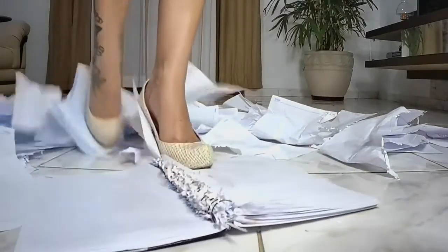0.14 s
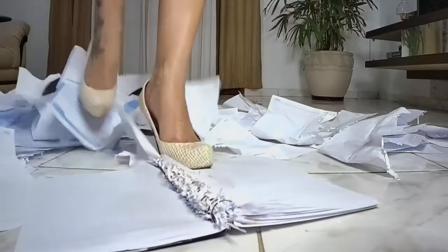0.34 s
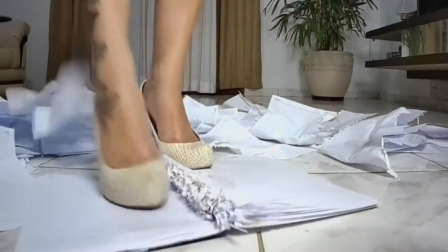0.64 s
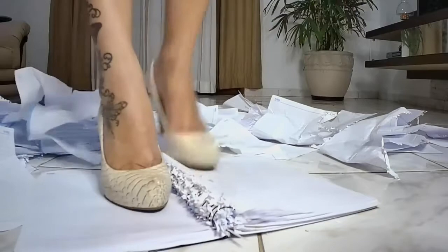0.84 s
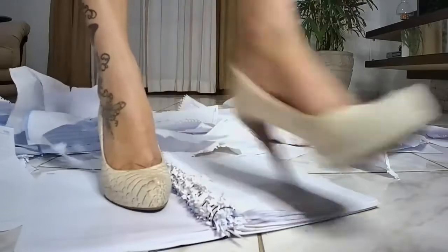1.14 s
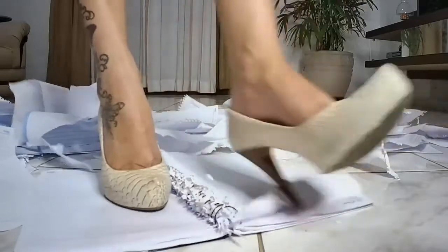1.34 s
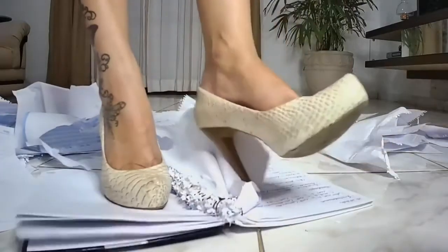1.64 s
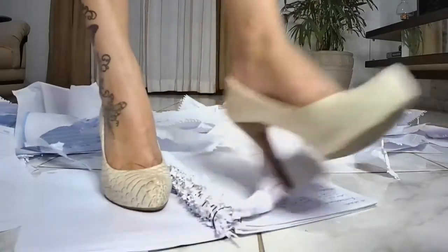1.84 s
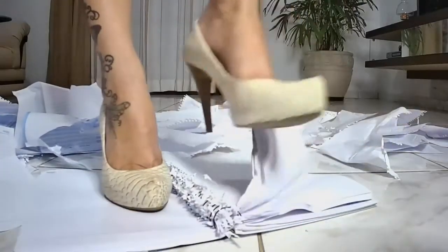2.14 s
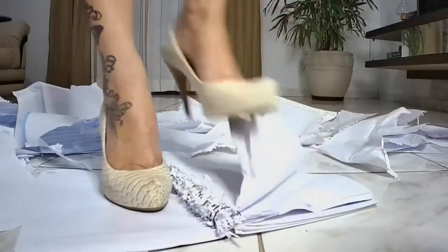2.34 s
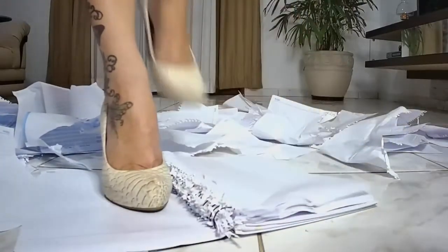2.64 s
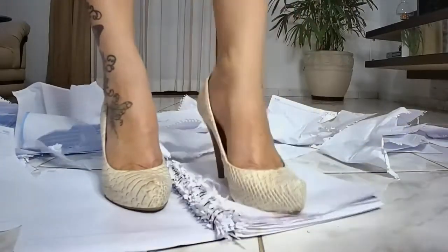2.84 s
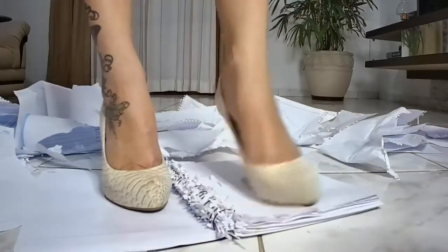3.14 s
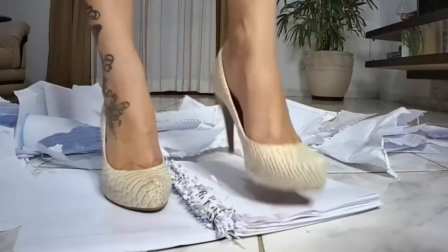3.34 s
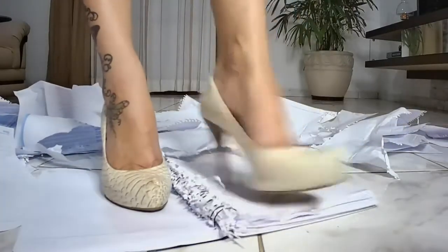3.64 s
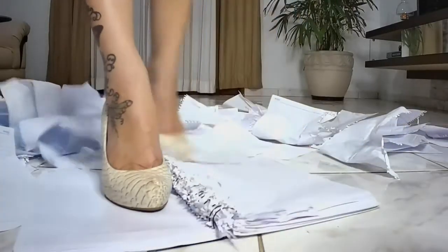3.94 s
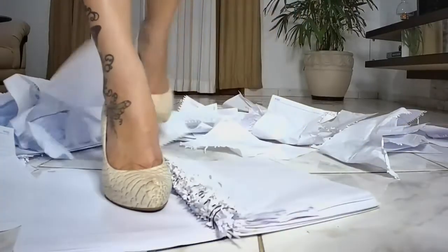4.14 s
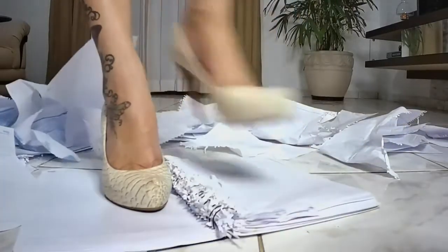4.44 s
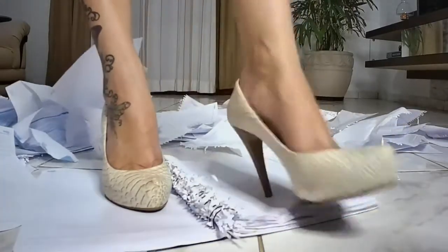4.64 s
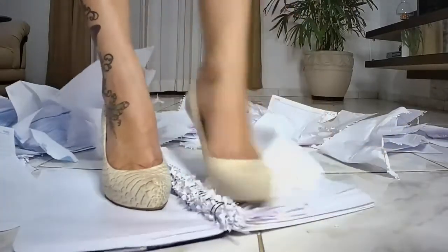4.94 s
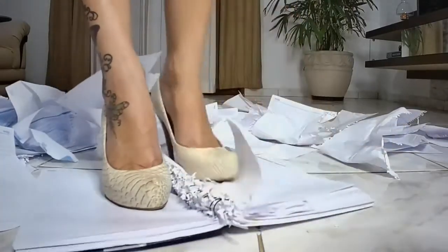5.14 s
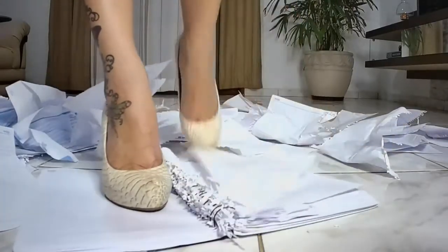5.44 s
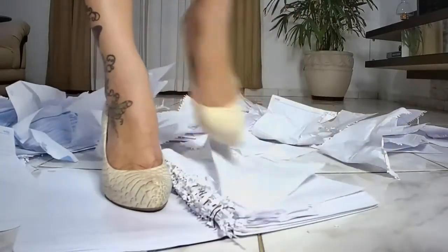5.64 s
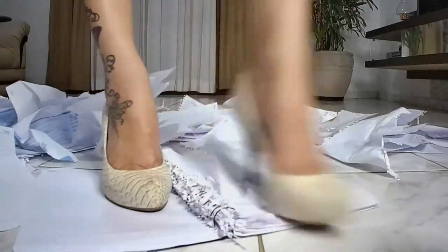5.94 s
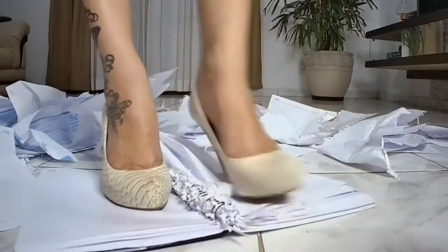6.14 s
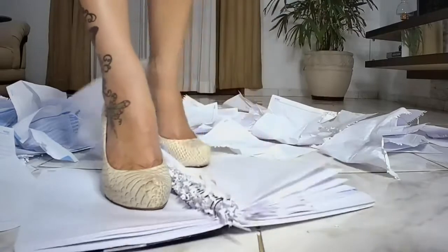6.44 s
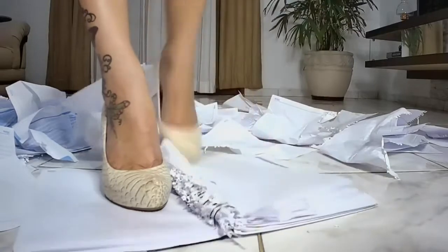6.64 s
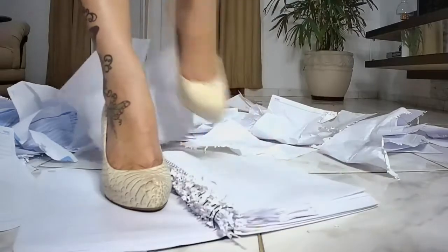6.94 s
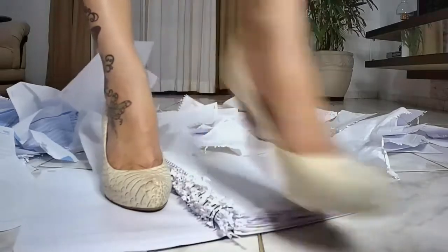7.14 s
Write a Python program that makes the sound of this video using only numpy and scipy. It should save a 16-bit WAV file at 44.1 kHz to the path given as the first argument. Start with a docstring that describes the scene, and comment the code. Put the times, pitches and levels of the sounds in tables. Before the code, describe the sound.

High heels tread on an open notebook and loose sheets on a tiled floor, heard close in a hard-walled living room with a short lively echo and barely audible hush. It opens mid-rustle, fading, with small snaps and soft taps around 0.5 s. Light thuds and crisp snaps cluster at 1.2 s and again near 2.0 s with thin paper crackle. At 2.7 s a sharp crack and padded knock stand out, followed by quiet. Knocks from 3.4 s lead into two hard, ripping tears at about 3.65 and 3.8 s, which trail away. Crackling strokes return from 4.6 s, with bright snaps around 5.0 s and a short hissy scrape at 5.25 s. After crisp creases at 5.9 s, the densest burst of snaps, crunching and heavy knocks hits at 6.1 s. Lighter rustles follow at 6.5 and 6.9 s, with a last soft tap and crinkle at 7.2 s.

```python
"""High heels tread on an open notebook on a tiled floor, heard close up in a hard-walled living room.
It opens mid-rustle, with light strokes and snaps; a sharp crack at 2.7 s leads to two hard tears near 3.7 s.
More strokes crackle from 4.6 s, the densest burst of snaps and knocks comes near 6.1 s, then it thins out.
Swarms of clicks ring as paper, pulses snap as creases, soft pushes thud, noisy resonances scrape and trail.
Decaying noise and standing waves make the room's answer; coloured noise is the faint hush throughout."""
import sys
import numpy as np
from scipy import signal
from scipy.fft import rfft, irfft
from scipy.io import wavfile
from scipy.ndimage import uniform_filter1d

SR = 44100
rng = np.random.default_rng(int(sys.argv[2]) if len(sys.argv) > 2 else 0)


def output_pcm(signal):
    """Save a mono or channel-first signal as 16-bit PCM at the path in sys.argv[1].

    Samples are clipped to [-1, 1] before scaling.
    """
    pcm = np.clip(np.atleast_2d(signal).T, -1, 1) * 32767
    wavfile.write(sys.argv[1], SR, np.round(pcm).astype(np.int16))


N = 321930  # samples

HUSH_DB = -64  # rms level of the background hush
TOP_HZ = 15900  # upper edge of the sound

# spectrum of the background hush: frequency_hz, level_db
HUSH_COLOUR = [(15, -28), (25, 0), (53, -3), (91, -6), (126, -10.5), (248, -14), (425, -19.5), (557, -25),
               (14600, -35.5), (15800, -43)]
# decay of the room: frequency_hz, t60_s
ROOM_DECAY = [(150, 1.28), (500, 0.8), (1500, 0.87), (4000, 0.64), (8000, 0.35), (15000, 0.37)]
# spectrum of the room's echo: frequency_hz, level_db
ECHO_COLOUR = [(60, -8), (250, -3), (700, -5), (1600, -2), (4000, -3.5), (9000, 3), (15000, -10)]
# standing waves of the room: frequency_hz, relative_level_db
STANDING_WAVES = [(173, -6), (203, 6), (240, 3), (395, -1), (597, 8), (839, -21)]
# drawn-out scrapes, hisses and ringing tails, each a noisy resonance at one pitch:
# start_s, end_s, level_db, pitch_hz, resonance_q
NOISY_RESONANCES = [(0, .144, -48, 251, 2.6), (1.189, 1.309, -48, 645, 2), (1.402, 1.607, -59, 9500, 2.6),
                    (2.147, 2.319, -57.5, 8900, 2.6), (3.373, 3.553, -47.5, 320, 2.8),
                    (4.63, 4.816, -48, 745, 2.6), (5.249, 5.308, -30, 4440, 2.6),
                    (5.678, 5.787, -63, 1430, 4), (5.679, 5.766, -64, 2800, 6),
                    (7.191, 7.3, -49.5, 670, 2.6)]
# low ringing after a knock, mostly the room's colour: frequency_hz, relative_level_db, t60_s
LOW_RINGING = [(221, -4.5, 0.24), (306, 10, 0.1), (414, -13, .1), (496, -10, .08), (650, 3, 0.072),
               (980, -24, 0.048), (1640, -12, 0.044)]
# heel and sole landing on the paper-covered tiles: start_s, thud_peak_db,
# pitch_hz (lower for a softer contact), paper_pad_thump_relative_db
LANDINGS = [(.456, -33.5, 750, -22), (.554, -33.5, 1410, -20), (.564, -42, 152, -18), (.645, -35, 800, -20),
            (1.154, -28, 500, -10), (1.187, -33, 697, -18), (1.231, -24.5, 651, -25),
            (1.773, -42.5, 258, -17), (1.971, -25.5, 1480, -14), (2.002, -37, 199, -12),
            (2.427, -33, 606, -18), (2.703, -16.5, 520, -11), (2.979, -29.5, 570, -17),
            (3.37, -20.5, 500, -18), (3.376, -16.5, 318, -38), (3.535, -37, 388, -19),
            (3.655, -19.5, 598, -16), (3.71, -14, 1303, -22), (3.764, -27, 278, -16),
            (4.512, -26, 730, -12), (4.522, -32, 377, -18), (4.627, -26, 690, -21), (5.101, -35, 232, -21),
            (5.911, -25, 1280, -14), (6.073, -21, 810, -20), (6.098, -17.5, 410, -16),
            (6.131, -13, 450, -12), (6.494, -32, 466, -20), (6.564, -23.5, 783, -11),
            (7.195, -35, 680, -21), (7.217, -26.5, 670, -24)]
# single creases snapping: start_s, level_db (before trim), pitch_hz, resonance_q,
# trailing_crackle_relative_db (before trim)
CREASES = [(.138, -30, 2500, 1.1, -12), (.3503, -25, 3860, 1.7, -6), (.4552, -28, 1900, 1.4, -15),
           (.6725, -24.5, 3790, .3, -7.5), (.715, -23, 4120, 1, -22), (.844, -42, 1280, 2, -9),
           (1.0927, -42, 2370, 4, -4), (1.228, -23.5, 2040, 1.3, -10), (1.2489, -18, 1800, 1, -14),
           (1.2545, -13, 6040, .7, -11), (1.278, -25, 5000, .8, -10), (1.2866, -23, 3400, .5, -8),
           (1.363, -20.5, 5510, 1.1, -30), (1.531, -32, 1180, 2, -18), (1.892, -22, 5170, 1, -17),
           (1.9713, -19, 2410, 1.7, -9.5), (1.9753, -20, 2960, 5, -13), (2.008, -19, 2200, 1.8, -13),
           (2.0823, -15, 2500, 2.2, -16), (2.4325, -33.5, 1650, 1.6, -7), (2.7156, -6, 5000, .55, -23),
           (2.979, -27, 1600, 1.3, -15), (3.3758, -19.5, 1890, .7, -16), (3.627, -19, 4000, .5, -4),
           (3.651, -7.5, 5200, 1.2, -7), (3.7084, -17, 2090, 1, -12), (3.8031, -5, 4550, 2.6, -27),
           (4.2846, -36, 2260, 3, -12), (4.5195, -33, 1630, 1.1, -4.5), (4.6282, -20, 1430, .6, -23),
           (4.739, -15, 6180, .4, -27), (4.9165, -15, 2440, 2.7, -10), (4.923, -11, 2500, 1, -14),
           (4.9745, -8, 2250, 1.6, -23), (5.0022, -7.5, 3800, .9, -12), (5.1544, -25, 2660, 2, -13),
           (5.321, -11, 5160, 2, -23), (5.6886, -36, 1570, 2, -5), (5.8188, -34, 2000, 1.5, -8),
           (5.855, -27, 3500, .7, -7.5), (5.8778, -12, 4300, 2, -10), (5.9211, -7, 3000, .7, -13.5),
           (6.0792, -17, 1890, 2.3, -8), (6.097, -8, 2770, .8, -6), (6.113, -3, 3330, .8, -8),
           (6.1226, -3, 2580, .8, -21), (6.1418, -7, 3930, .7, -7.5), (6.1557, -7, 2600, .6, -10),
           (6.1657, -4.5, 1800, .8, -11), (6.4573, -25, 4250, 2.1, -6.5), (6.56, -19.5, 4940, 3.5, -5),
           (6.5795, -18, 4050, 1, -10), (6.9095, -27, 2600, 2, -10), (7.1327, -40, 2200, 1.5, -7),
           (7.2065, -27, 1800, 3.1, -8), (7.2182, -21, 2030, .6, -20.5), (7.283, -27, 1450, 2.9, -12)]
# strokes of the foot through the paper: start_s, attack_s, hold_s, release_s (per 20 dB),
# level_db, low_flapping_relative_db (before trim), sliding_hiss_relative_db (at its onset),
# pitch_hz (of the flexing sheet)
FOOT_STROKES = [(0, .003, .02, .34, -41.5, -2, -4.5, 2450), (.28, .06, .02, .36, -48.5, -3.5, -6.5, 2350),
                (.545, .015, .01, .11, -54, 3, -8, 1900), (.635, .04, .005, .16, -45.5, -7, -7, 2300),
                (1.08, .012, .05, .1, -68, 0, -16, 2200), (1.146, .007, .04, .15, -55, -3, -3, 2050),
                (1.19, .06, .015, .15, -45, -5.5, -3, 2650), (1.39, .05, .14, .08, -54, -2, -5.5, 2650),
                (1.63, .05, .1, .35, -54, -2, -3.5, 2500), (1.835, .04, .03, .4, -51.5, -3, -7.5, 2550),
                (2.11, .09, .05, .15, -59, -12, 1.5, 3000), (2.689, .008, .022, .085, -39, 2, -2, 2450),
                (2.955, .025, .035, .13, -58, 3, 3, 2100), (3.36, .03, .01, .17, -54.5, 8, -7, 1500),
                (3.515, .023, .005, .085, -50, 4, 0, 2270), (3.608, .028, .045, .17, -31, -2.5, 1, 3050),
                (3.78, .035, .014, .18, -27, -5.5, -4.5, 2700), (4.1, .025, .005, .2, -52, -5, -7, 2500),
                (4.42, .015, .02, .15, -65, -2, -9, 2200), (4.634, .007, .04, .2, -53, 1, -4, 2100),
                (4.7, .047, .032, .07, -40, -1.5, 1.5, 2680), (4.835, .08, .07, .11, -34, -2, -2.5, 2400),
                (5.135, .025, .05, .1, -48, -4, -4, 2700), (5.16, .1, .05, .075, -39, -10, 6, 3900),
                (5.31, .02, .003, .11, -40, -7, -4, 3300), (5.435, .015, .01, .11, -55, 2, 2, 2800),
                (5.78, .05, .02, .05, -61, 3, 6, 2700), (5.842, .04, .046, .13, -36.5, -4, -1, 2950),
                (6.048, .065, .06, .145, -27, -1.5, -4.5, 2150), (6.21, .04, .06, .14, -39, -8, 1, 2200),
                (6.445, .014, .06, .1, -47.5, -6, -1, 3050), (6.5, .1, .012, .12, -37.5, -4.5, 0, 3300),
                (6.7, .06, .09, .1, -60, -1, -4, 2600), (6.902, .012, .005, .06, -52, 3, -5, 2070),
                (6.912, .025, .02, .13, -58, -6, 13, 3340), (6.98, .045, .005, .11, -52, -1, -8, 2600),
                (7.18, .04, .085, .1, -46, -2, -5, 2150)]
# spectrum of the rustling paper: frequency_hz, level_db
PAPER_COLOUR = [(29, -51), (50, -17), (184, -4.5), (304, -4), (397, -2.5), (437, -3), (597, -2), (642, -2),
                (742, -1.5), (1170, 0), (1570, 0), (4520, -2.5), (10000, 4.5), (12100, 1.5), (15800, -8.5)]


def undb(db):
    """Decibels to gain."""
    return 10 ** (np.asarray(db) / 20)


def unit(x):
    """Scale to an rms of one."""
    return x / np.sqrt(np.mean(x ** 2) + 1e-20)


def along(points, hz):
    """Read (Hz, value) points on a log-frequency axis."""
    f, value = np.transpose(points)
    return np.interp(np.log(hz + 1e-3), np.log(f), value)


def colour(x, points):
    """Filter by a (Hz, dB) spectrum."""
    return irfft(rfft(x) * undb(along(points, np.fft.rfftfreq(len(x), 1 / SR))), len(x))


def resonate(x, hz, q):
    """A damped resonance with gain one at its centre."""
    w = 2 * np.pi * min(hz, .42 * SR) / SR
    a = np.sin(w) / (2 * q)
    return signal.lfilter([a, 0, -a], [1 + a, -2 * np.cos(w), 1 - a], x)


def split(x, edges_hz, order=3):
    """Overlapping bands that sum to the whole."""
    f, spectrum = np.fft.rfftfreq(len(x), 1 / SR), rfft(x)
    lowpasses = [1 / (1 + (f / hz) ** (2 * order)) for hz in edges_hz]
    below = [0 * f] + lowpasses + [0 * f + 1]
    return irfft(np.diff(below, axis=0) * spectrum, len(x))


def add(out, s, sound):
    """Mix a sound in at a time in seconds."""
    i = max(int(s * SR), 0)
    out[i:i + len(sound)] += sound[:len(out) - i]


def clicks(size, rate, spread_db):
    """Impulses at random moments, rate per second, with scattered levels and random sign."""
    chance, strength = rng.random(size), rng.standard_normal(size)
    sign = rng.choice([-1, 1], size)
    return (chance < rate / SR) * sign * undb(spread_db * np.minimum(strength, 2))


def hush():
    """The steady background of the room: coloured noise."""
    return undb(HUSH_DB) * unit(colour(rng.standard_normal(N), HUSH_COLOUR))


def room(x, wet_db, first_s=0.014, build_s=0.0043, modes_db=-21):
    """Walls and ceiling answer after a short gap; treble dies faster, a few standing waves ring."""
    t = np.arange(SR) / SR

    def fade(hz):
        return np.exp(-np.log(1000) * t / along(ROOM_DECAY, hz))

    centres = np.geomspace(125, 14000, num=8)
    bands = split(rng.standard_normal(len(t)), np.sqrt(centres[1:] * centres[:-1]))
    diffuse = sum(band * fade(hz) for hz, band in zip(centres, bands))
    standing = 0
    for hz, db in STANDING_WAVES:
        standing = standing + undb(db) * np.sin(2 * np.pi * (hz * t + rng.random())) * fade(hz)
    onset = np.clip((t - first_s) / build_s, 0, 1)
    tail = (unit(diffuse) + undb(modes_db) * unit(standing)) * onset
    tail = colour(tail / np.linalg.norm(tail), ECHO_COLOUR)
    return x + undb(wet_db) * signal.fftconvolve(x, tail)[:N]


def scrapes_and_tails(clicks_per_cycle=1.1, spread_db=3):
    """Random clicks excite a resonance at one pitch, heard as a drawn-out scrape, hiss or ringing tail."""
    out = np.zeros(N)
    for start, end, db, hz, q in NOISY_RESONANCES:
        size = max(int((end - start) * SR), 2)
        excitation = clicks(size, clicks_per_cycle * hz, spread_db)
        resonance = resonate(resonate(excitation, hz, q), hz, q / 2)
        add(out, start, undb(db) * unit(resonance) * signal.windows.tukey(size))
    return out


def knocks(q=1.58, contact_cycles=0.44, ring_db=-33, crush_db=-19, crush_s=.0045,
           pad_hz=112, pad_q=1.35):
    """A cushioned push thuds, leaves a faint low ringing and thumps the paper pad; fibres crush around it."""
    out, t = np.zeros(N), np.arange(SR // 4) / SR
    ring = sum(undb(db - 60 * t / t60) * np.sin(2 * np.pi * hz * t) for hz, db, t60 in LOW_RINGING)
    for s, db, hz, pad_db in LANDINGS:
        push = np.sin(np.pi * np.minimum(t * hz / contact_cycles, 1)) ** 2
        thud = resonate(push, hz, q)
        pad = resonate(resonate(push, pad_hz, pad_q), 2 * pad_hz, 1)
        ringing = signal.fftconvolve(push / push.sum(), ring)[:len(t)]
        blow = thud / np.abs(thud).max() + undb(ring_db) * ringing
        blow = blow + undb(pad_db) * pad / np.abs(pad).max()
        add(out, s, undb(db) * blow)
        # the loose top sheets are touched just before the blow reaches the tile
        fibres = unit(resonate(resonate(rng.standard_normal(len(t)), hz, 0.69), 1170, 0.6))
        swell = t / crush_s * np.exp(1 - t / crush_s)
        add(out, s - crush_s, undb(db + crush_db) * fibres * swell)
    return out


def snaps(creases, crack_s=0.00066, crack_db=-11, trail_s=0.0034, trail_trim_db=1,
          pulse_db=-3, trim_db=-1.0, skirt=0.34):
    """A crease flips with one sharp pulse and a crack, and its neighbours give way in a short trail."""
    out, t = np.zeros(N), np.arange(2048) / SR
    for s, db, hz, q, crackle_db in creases:
        pulse = resonate(resonate(signal.unit_impulse(len(t)), hz, q), hz, q / 2)
        pulse *= rng.choice([-1, 1]) * undb(pulse_db) / np.abs(pulse).max()
        noise = rng.standard_normal(len(t))
        fibres = unit(resonate(resonate(noise, hz, q / 2), hz, skirt * q))
        crack = undb(crack_db) * np.exp(-t / crack_s)
        trail = undb(crackle_db + trail_trim_db) * np.exp(-t / trail_s)
        add(out, s, undb(db + trim_db) * (pulse + fibres * np.hypot(crack, trail)))
    return out


def stray_creases(stroke_db, stroke_hz, count=90, above_db=10.5, scatter_db=3,
                  scatter_octaves=.6, q=1.8, crackle_db=-11):
    """Small creases flip at random moments, their level following how hard the paper is moved."""
    moments, chance = rng.integers(0, N, count), rng.standard_normal((count, 2))
    creases = []
    for i, (strong, high) in zip(moments, chance):
        db = stroke_db[i] + above_db + scatter_db * strong
        hz = stroke_hz[i] * 2 ** (scatter_octaves * high)
        creases.append((i / SR, db, hz, q, crackle_db))
    return creases


def strokes(attack_curve=1.3, settle_db=-25, settle_s=.62, hiss_fade_db_per_s=10):
    """Each stroke swells, holds and dies, hiss faster, then settles; gives level, flapping, hiss, pitch."""
    t = np.arange(0, N / SR, .001)
    columns = np.transpose(FOOT_STROKES)[:, :, None]
    start, attack, hold, release, db, flap_db, hiss_db, hz = columns
    rise = np.clip((t - start) / attack, 0, 1) ** attack_curve
    after = np.maximum(t - start - attack - hold, 0)
    # a quick fall, then the slower settling of the sheets (settle_s per 20 dB)
    fall_db = np.maximum(-20 * after / release, settle_db - 20 * after / settle_s)
    power = (rise * undb(db + fall_db)) ** 2 + 1e-14
    total = power.sum(axis=0)
    curves = [10 * np.log10(total)]
    # the strongest stroke dominates the tone
    for tone in (flap_db, hiss_db - hiss_fade_db_per_s * after, hz):
        curves.append((tone * power).sum(axis=0) / total)
    return [np.interp(np.arange(N) / SR, t, curve) for curve in curves]


def crinkle(rate, spread_db, facet_q=1.57, facet_db=6, judder_db=1.5):
    """Each tiny buckle rings paper facets of several sizes; sheets rub unevenly in between."""
    buckles = clicks(N, rate, spread_db)
    facets = 0
    for hz in np.geomspace(200, 13000, num=8):
        share = undb(facet_db * np.clip(rng.standard_normal(N), -2, 1)) * rng.choice([-1, 1], N)
        facets = facets + resonate(buckles * share, hz, facet_q)
    judder = unit(uniform_filter1d(rng.standard_normal(N), size=260))
    slide = rng.standard_normal(N) * undb(judder_db * judder)
    return colour(unit(facets) + unit(slide), PAPER_COLOUR)


def flex(x, hz, focus_db=8, width_octaves=1.0, wander_db=2):
    """A bending sheet favours the bands round its pitch, and their levels wander as it deforms."""
    centres = np.geomspace(1100, 5500, num=7)
    bands = split(x, np.sqrt(centres[1:] * centres[:-1]), order=5)
    out = power = 0
    for centre, band in zip(centres, bands):
        wander = unit(uniform_filter1d(rng.standard_normal(N), size=1500))
        focus = np.exp(-.5 * (np.log2(centre / hz) / width_octaves) ** 2)
        gain = undb(focus_db * focus + wander_db * wander)
        out = out + gain * band
        power = power + gain ** 2 * np.var(band)
    return out / np.sqrt(power)  # even loudness at any pitch


def rustle(db, low_db, high_db, hz, flap_trim_db=1.0, crinkle_db=-1, light_db=-54, hard_db=-36):
    """Strokes of the foot: whole sheets flap low, creases crinkle, surfaces hiss."""
    # a light touch frees single buckles; a hard push makes them merge into a rip
    push = np.clip((db - light_db) / (hard_db - light_db), 0, 1)
    light = unit(crinkle(rate=650, spread_db=4.5))
    hard = unit(crinkle(rate=2600, spread_db=5.0))
    paper = np.sqrt(1 - push) * light + np.sqrt(push) * hard
    low, mid, high = split(paper, [1000, 5500])
    flapping = undb(low_db + flap_trim_db) * unit(low)
    creasing = undb(crinkle_db) * flex(mid, hz)
    hiss = undb(high_db) * unit(high)
    return undb(db) * (flapping + creasing + hiss)


def scene():
    """Paper, knocks, scrapes and tails sound in the room over the hush."""
    db, low_db, high_db, hz = strokes()
    paper = rustle(db, low_db, high_db, hz)
    paper = paper + snaps(list(CREASES) + stray_creases(db, hz))
    return (room(paper + knocks() + scrapes_and_tails(), wet_db=-10.5) + hush())[None]


def record(dry, ceiling=0.51):
    """The recorder rounds the loudest peaks and cuts the top."""
    rounded = ceiling * np.tanh(dry / ceiling)
    top_cut = signal.ellip(10, .2, 70, TOP_HZ, fs=SR, output="sos")
    return signal.sosfilt(top_cut, rounded)


dry = scene()
out = record(dry)
output_pcm(out)
```